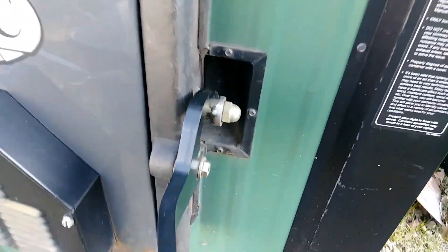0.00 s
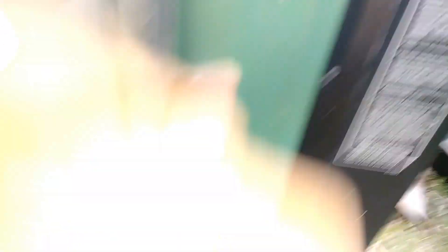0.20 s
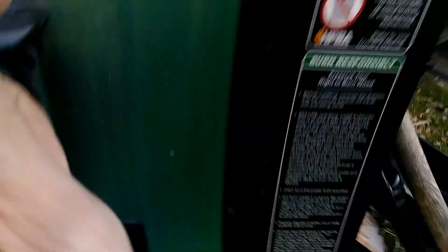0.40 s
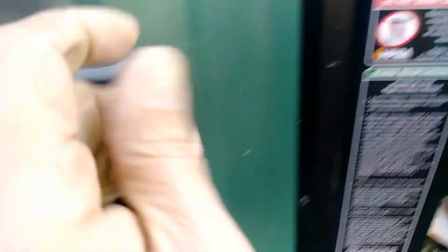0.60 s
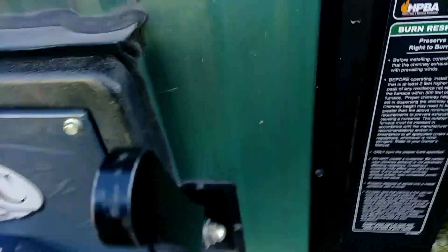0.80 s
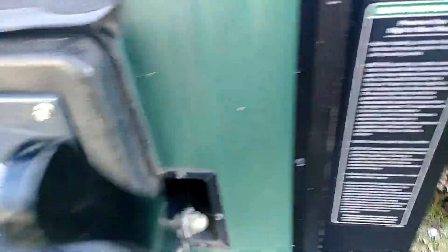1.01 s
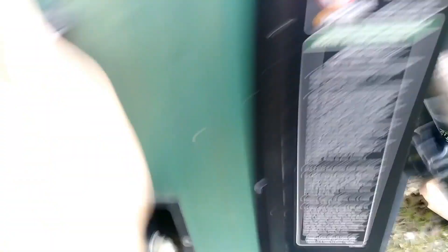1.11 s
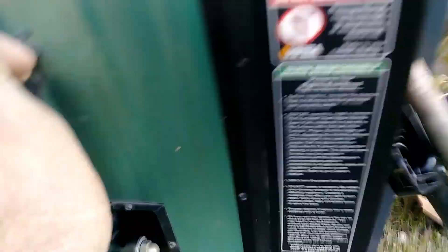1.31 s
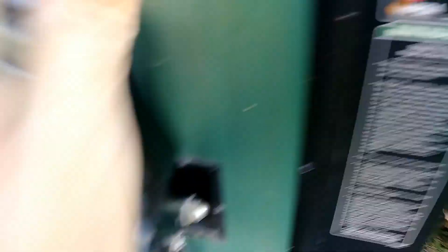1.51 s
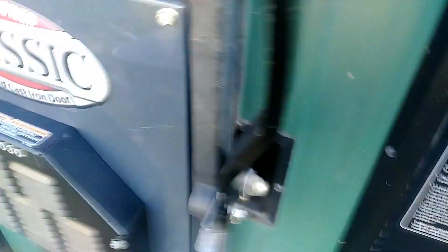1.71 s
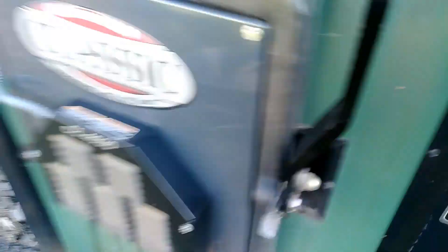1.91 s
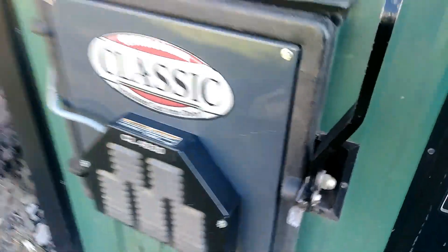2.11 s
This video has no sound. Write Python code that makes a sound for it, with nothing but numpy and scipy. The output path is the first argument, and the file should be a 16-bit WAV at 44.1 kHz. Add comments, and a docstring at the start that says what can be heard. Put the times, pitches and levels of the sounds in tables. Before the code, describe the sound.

A heavy steel furnace door bangs shut with a rattle, then latches with a clank.

```python
"""A quiet yard, close to a phone: a heavy steel furnace door is swung shut. It scrapes, knocks, bangs and
chatters in its frame; loose parts tick after it. A second later the latch lever chatters home and the
door thumps tight. Each blow rings lever, door plate, handle and the hollow steel shell.
Faint squeaks come and go over a low outdoor murmur and hum."""
import sys
import numpy as np
from scipy import signal
from scipy.fft import rfft, irfft
from scipy.io import wavfile
from scipy.ndimage import uniform_filter1d

SR = 44100
rng = np.random.default_rng(int(sys.argv[2]) if len(sys.argv) > 2 else 0)


def output_pcm(signal):
    """Save a mono or channel-first signal as 16-bit PCM at the path in sys.argv[1].

    Samples are clipped to [-1, 1] before scaling.
    """
    pcm = np.clip(np.atleast_2d(signal).T, -1, 1) * 32767
    wavfile.write(sys.argv[1], SR, np.round(pcm).astype(np.int16))


N = 97020
T = np.arange(N) / SR
BODY_LOW_HZ, BODY_TOP_HZ = 110, 600
CONTACT_SAMPLES = 600


# Steel-on-steel hits and how hard each drives the rings:
# start_s, contact_ms, lever_db, door_ajar_db, door_shut_db, shell_db, handle_db, crack_db
BLOWS = [(0.2341, 0.21, 8.5, -12, -35.5, -2, -23.5, -32), (0.2722, 0.048, 1.5, -7, -27, -9, -4, -2),
         (.278, .08, -5, -28, -31.5, -19, -19, -20), (.29, .08, 2.5, -19, -29, -21, -15, -19),
         (.3015, .03, -5.5, -21.5, -27, -21, -13.5, -10.5),
         (0.3095, 0.05, -11, -22.5, -29, -14.5, -24, -17), (0.3228, 0.12, 9, -14, -27, -18, -15, -11.5),
         (.3375, 0.13, 3, -23, -32, -21.5, -18.5, -35.5), (.348, 0.13, 4, -15, -24.5, -25.5, 2.5, -38),
         (.5231, 0.046, -36, -61.5, -60.5, -33.5, -36, -39),
         (0.6103, 0.052, -45, -76.5, -64, -40.5, -38, -35),
         (.728, 0.047, -64.5, -78.5, -69.5, -58.5, -44.5, -54),
         (1.1615, .05, -28.5, -71, -50.5, -37, -61, -38.5), (1.168, 0.15, 7.5, -25.5, -40, -12, -56, -44.5),
         (1.1735, 0.15, 7.5, -44.5, -42, -20.5, -53, -20),
         (1.179, 0.053, 0.5, -31.5, -26, -22.5, -56, -29.5), (1.186, 0.16, 10, -28, -35, -24, -49, -29.5),
         (1.1916, 0.16, 3.5, -42, -30, -8.5, -60.5, -38.5), (1.2023, 0.053, 0.5, -12, -7.5, -8, -25, -36),
         (1.207, 0.29, -32.5, -21, -12.5, -32, -43, -28), (2.104, 0.038, -58, -89, -80, -67.5, -83, -63.5)]


def door():
    """Single blows and chatter push on each steel part, and each answers with its own ring."""
    boom, clang = shell()
    rings = (lever(), door_ajar(boom), door_shut(boom), clang, handle(), crack())
    forces = np.zeros((len(rings), N + CONTACT_SAMPLES))
    for start_s, contact_ms, *rings_db in BLOWS:
        i, pulse = int(start_s * SR), push(contact_ms)
        forces[:, i:i + len(pulse)] += undb(rings_db)[:, None] * pulse
    forces = forces[:, :N] + chatter()
    return sum(conv(force, response) for force, response in zip(forces, rings))


# Envelope of the rattle after the bang: time_s, level_db
CHATTER = [(.238, -30), (0.253, -21), (.268, -38.5), (0.272, -16), (.30, -21), (.33, -24), (0.358, -21),
           (0.391, -64.5), (.43, -46.5)]
CHATTER_SHARE_DB = (3, -15, -32.5, -4, -6, -11)  # lever, door ajar, door shut, shell, handle, crack


def chatter():
    """The door rattles in its frame: a burst of tiny hard contacts, one force track per ring."""
    env = undb(np.interp(T, *np.transpose(CHATTER), left=-200, right=-200))
    forces = []
    for share_db in CHATTER_SHARE_DB:
        contacts = rng.choice([-1, 1], N) * clicks(per_s=420) * env
        forces.append(undb(share_db) * conv(contacts, push(contact_ms=0.049)))
    return np.array(forces)


# Modes of the latch lever: pitch_hz, level_db, t60_s
LEVER_MODES = [(864, -7.5, 0.055), (1069, -4.5, 0.062), (1194, -2.5, .1), (1450, 0.5, 0.09),
               (1696, -2.5, 0.041), (1868, -5, 0.07), (2040, 0.5, 0.1), (2692, -9, 0.061),
               (4450, -9, 0.037), (4860, -9.5, .1), (4980, -30, 0.055), (6160, -31.5, 0.028),
               (6750, -19, 0.069), (8040, -22, 0.018), (1280, 3.5, 0.008), (1770, 7.5, 0.02)]


def lever():
    """A short, bright clank; so small a part radiates little bass."""
    return low_cut(ring(LEVER_MODES) / 4, hz=810)


# Modes of the door while ajar: pitch_hz, level_db, t60_s
AJAR_DOOR_MODES = [(86, -10.5, 0.73), (135, -14.5, 0.15), (168.2, -4, .45), (224.5, -10.5, 0.68),
                   (248, -5.5, 1), (268, -3, 0.21), (354, -12.5, 0.49), (389, -19.5, 0.57),
                   (538.7, -11, 0.51), (747, -7.5, 0.2)]


def door_ajar(boom):
    """The heavy plate of the unlatched door rings low, thickened by the boom of the body."""
    return low_cut(ring(AJAR_DOOR_MODES) / 4, BODY_LOW_HZ) + undb(4.5) * boom


# Modes of the door when shut: pitch_hz, level_db, t60_s
SHUT_DOOR_MODES = [(140, -14.5, 0.55), (175, -4.5, 0.31), (174.5, -8, 1.), (200, -3, 1), (226.6, -6, 0.63),
                   (246.5, -4, .6), (263, -8, 0.9), (367, -17.5, .5), (403.6, -15, 0.32), (434, -6, .4),
                   (533.3, 6, 0.29), (615, -8, 0.31), (744, -10.5, .44), (290, 6, 0.15)]


def door_shut(boom):
    """The hollow low thud of the door as it latches tight."""
    return low_cut(ring(SHUT_DOOR_MODES) / 4, BODY_LOW_HZ) + undb(1.5) * boom


# Dense ring of the steel shell: pitch_hz, density_db, t60_s
SHELL_RING = [(50.6, -15.5, 0.44), (128, -14, 1.2), (250, -1, 0.75), (500, -13, 0.83), (1070, -3, 0.37),
              (2080, -9, 0.58), (2480, -9, .4), (3040, -12, 0.35), (4000, -17, 0.47), (4930, -11.5, 0.21),
              (6000, -21.5, .25), (7200, -26.5, 0.36), (9900, -33, 0.062), (13500, -24, 0.29),
              (16000, -39, 0.22)]
EARLY_DB, EARLY_T60_SHARE, SHELL_RISE_S = 7, 0.21, 0.0012


def shell():
    """Countless modes in third-octave groups, each dying at its own rate: low boom and the clang above."""
    boom_and_clang = np.zeros((2, N))
    for hz in 40 * 2 ** np.arange(0, 8.75, 1 / 3):
        t60_s = curve_at(SHELL_RING, hz, column=2)
        env = fall(t60_s) + undb(EARLY_DB) * fall(t60_s * EARLY_T60_SHARE)  # tail plus a strong front
        gain = undb(curve_at(SHELL_RING, hz, column=1)) * np.sqrt(hz / 1000)
        is_clang = hz > BODY_TOP_HZ
        tones = many_modes(mean_gap_hz=8) if is_clang else rng.standard_normal(N)
        boom_and_clang[int(is_clang)] += unit(band(tones, hz, hz / 6)) * env * gain
    return boom_and_clang * (1 - np.exp(-T / SHELL_RISE_S)) / 4


# Modes of the handle: pitch_hz, level_db, t60_s
HANDLE_MODES = [(1985, -7, .55), (2051, 1, 1.), (2075, -5, .7), (3440, -18, .45), (3690, -5, .5),
                (3770, -2, .5), (4960, -12, .4), (6842, -8, .36), (6990, -11, .28)]


def handle():
    """A thin, high ring that hangs on after the hit."""
    return ring(HANDLE_MODES) / 20


def crack(decay_ms=2):
    """The dry snap of steel on steel: a noise burst with a brighter edge on top."""
    noise = rng.standard_normal(N)
    snap = unit(band(noise, hz=5650, width_hz=2600))
    edge = unit(band(noise, hz=13500, width_hz=2600))
    return (snap + undb(-7.5) * edge) * np.exp(-T * 1000 / decay_ms)


# Scrapes of door, lever and handle: start_s, end_s, start_db, end_db, centre_hz, width_hz
SCRAPES = [(0.068, 0.24, -67, -32.5, 1290, 700), (0.106, 0.236, -54, -64, 3830, 1000),
           (0.124, 0.22, -46.5, -40.5, 221, 150), (0.175, 0.237, -62, -68, 5360, 600),
           (1.09, 1.18, -58, -53, 1695, 930), (0, 0.037, -59, -88, 4160, 1200),
           (0.45, 0.492, -60, -59, 5100, 2700), (0.54, 0.546, -38, -61, 3940, 3000),
           (0.643, 0.677, -49, -66, 4260, 2260), (.65, .74, -47, -67.5, 2800, 700),
           (.88, 1.0, -57, -55, 1300, 450), (1.09, 1.16, -55, -47.5, 600, 150)]


def scrapes(fade_s=0.013):
    """Rubbing steel: tiny contacts crowd into a band of grit."""
    out = 0
    for start_s, end_s, start_db, end_db, centre_hz, width_hz in SCRAPES:
        gate = np.clip(np.minimum(T - start_s, end_s + fade_s - T) / fade_s, 0, 1)
        grit = unit(band(clicks(per_s=1500), centre_hz, width_hz, order=4))
        out += grit * gate * undb(np.interp(T, [start_s, end_s], [start_db, end_db]))
    return out


# Faint squeaks: start_s, half_fade_s, pitch_hz, level_db
SQUEAKS = [(0.149, 0.1, 1030, -43), (.528, .025, 3041, -47), (.88, .035, 2810, -65), (.88, .06, 3255, -68),
           (.915, .1, 2590, -62), (1.083, .06, 2740, -62), (1.075, .06, 2350, -69), (1.08, .05, 5420, -75),
           (1.501, .052, 2176, -62), (1.709, .04, 2220, -64), (1.79, .03, 2186, -67),
           (1.874, .055, 2215, -67), (2.1, .011, 2680, -67)]


def squeaks(attack_s=0.008, rough_db=4):
    """Rough, narrow tones that swell quickly and fade."""
    out = 0
    for start_s, half_fade_s, pitch_hz, level_db in SQUEAKS:
        env = np.interp(T - start_s, [0, attack_s, half_fade_s, 1.5 * half_fade_s], [0, 1, .5, 0])
        gain = undb(level_db + rough_db * wander(per_s=160))
        tone = unit(band(rng.standard_normal(N), pitch_hz, width_hz=90))
        out += gain * env * tone
    return out


# Tone colour of the outdoor bed: pitch_hz, density_db
YARD_SPECTRUM = [(30, -18), (70, -2.5), (120, -2.5), (250, -3), (360, -3.5), (480, -26), (640, -6),
                 (900, -4.5), (1200, -11), (1600, -27), (2300, -39), (3200, -44), (6000, -56.5)]
# Fader moves on its four ranges: time_s, bass_db, low_mid_db, mid_db, upper_db
YARD_FADERS = [(0, -59.5, -53, -52, -39), (0.098, -63.5, -49.5, -49, -46.5),
               (0.749, -42.5, -50.5, -47, -57), (.87, -46.5, -60.5, -49, -44.5),
               (1.08, -47, -68, -48, -46.5), (1.602, -45, -52, -49, -54.5), (1.801, -46.5, -49, -54.5, -59),
               (2., -61, -55, -57, -58.5), (2.073, -58, -45.5, -64, -55), (2.2, -57, -59.5, -63, -56.5)]
YARD_SPLIT_HZ, HUM_HZ, HUM_DB = (520, 760, 1350), 120, -56.5


def yard(swell_db=2.5, flicker_db=2.5):
    """A low outdoor murmur whose narrow bands swell and flicker independently, and a faint hum."""
    times_s, *faders_db = np.transpose(YARD_FADERS)
    murmur = 0
    for hz in 40 * 2 ** np.arange(0, 7.2, 1 / 6):
        db = np.interp(T, times_s, faders_db[np.searchsorted(YARD_SPLIT_HZ, hz)])
        db += curve_at(YARD_SPECTRUM, hz, column=1)
        db += swell_db * wander(per_s=7) + flicker_db * wander(per_s=25)
        noise = unit(band(rng.standard_normal(N), hz, hz / 16))
        murmur += noise * undb(db) * np.sqrt(hz / 2000)
    hum = undb(HUM_DB + 1.5 * wander(per_s=9.1)) * np.sin(2 * np.pi * HUM_HZ * T)
    return murmur + hum


def push(contact_ms):
    """Force of one contact, unit area: longer is duller."""
    t = T[1:CONTACT_SAMPLES]
    pulse = t * np.exp(-t * 1000 / contact_ms)
    return pulse / pulse.sum()


def clicks(per_s, spread_db=2.5):
    """Contacts at random moments with uneven sizes."""
    return (rng.random(N) < per_s / SR) * undb(spread_db * rng.exponential(size=N))


def ring(modes):
    """Response of a set of modes to a click."""
    return sum(undb(db) * np.sin(2 * np.pi * hz * T) * fall(t60_s) for hz, db, t60_s in modes)


def many_modes(mean_gap_hz):
    """Steady tones at random pitches and strengths."""
    bins = N // 2 + 1
    sounding = rng.random(bins) < SR / N / mean_gap_hz
    return irfft(sounding * (rng.standard_normal(bins) + 1j * rng.standard_normal(bins)), N)


def wander(per_s):
    """Random levels, smoothed into a drift."""
    hold = int(SR / per_s)
    steps = np.repeat(rng.standard_normal(N // hold + 1), hold)
    return 1.3 * uniform_filter1d(uniform_filter1d(steps, hold), hold)[:N]


def band(x, hz, width_hz, order=2):
    """Bell-shaped band-pass; a higher order is squarer."""
    f = np.fft.rfftfreq(len(x), 1 / SR)
    return irfft(rfft(x) * np.exp(-np.abs((f - hz) / width_hz) ** order), len(x))


def low_cut(x, hz, order=4):
    return signal.sosfilt(signal.butter(order, hz, "high", fs=SR, output="sos"), x)


def curve_at(table, hz, column):
    rows = np.array(table)
    return np.interp(np.log(hz), np.log(rows[:, 0]), rows[:, column])


def fall(t60_s):
    return np.exp(-np.log(1000) * T / t60_s)


def undb(db):
    return 10 ** (np.asarray(db) / 20)


def unit(x):
    return x / np.sqrt(np.mean(x ** 2))


def conv(x, response):
    return signal.fftconvolve(x, response)[:N]


def scene():
    """The door up front with its scrapes and squeaks, the yard behind, in mono."""
    return (door() + scrapes() + squeaks() + yard())[None]


def record(dry):
    """The phone drops the deep bass, flattens the loudest peaks, hisses faintly and cuts the top."""
    ceiling, knee, top_hz = 1.03, 9, 16300
    thin = low_cut(dry, hz=67, order=2)
    flattened = thin / (1 + np.abs(thin / ceiling) ** knee) ** (1 / knee)
    hiss = undb(-90) * rng.standard_normal(dry.shape)
    return signal.sosfilt(signal.ellip(10, .2, 70, top_hz, fs=SR, output="sos"), flattened + hiss)


dry = scene()
out = record(dry)
output_pcm(out)
```